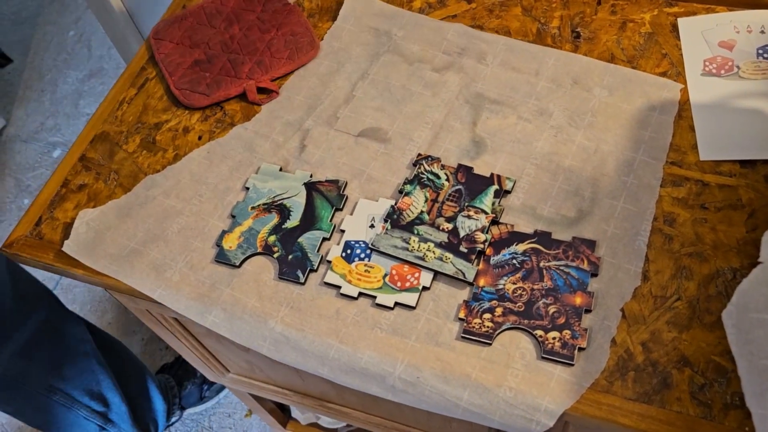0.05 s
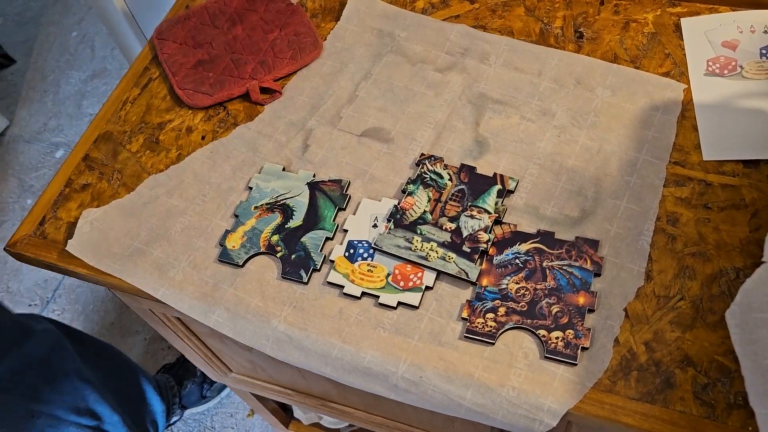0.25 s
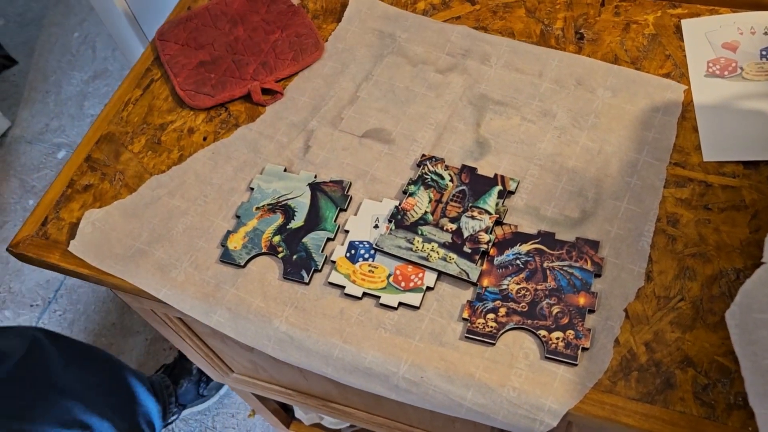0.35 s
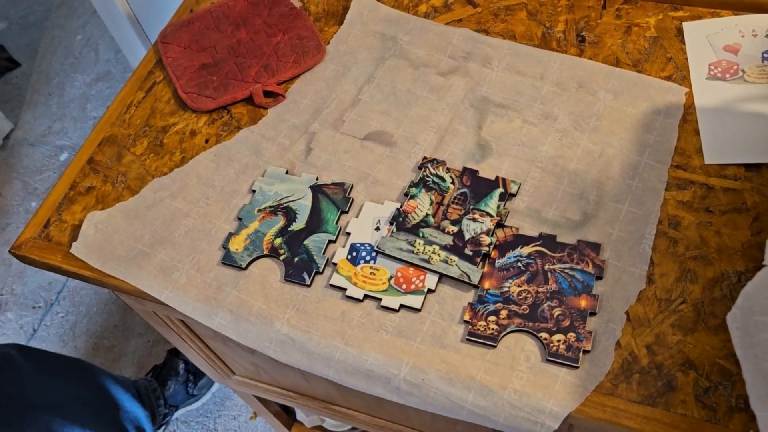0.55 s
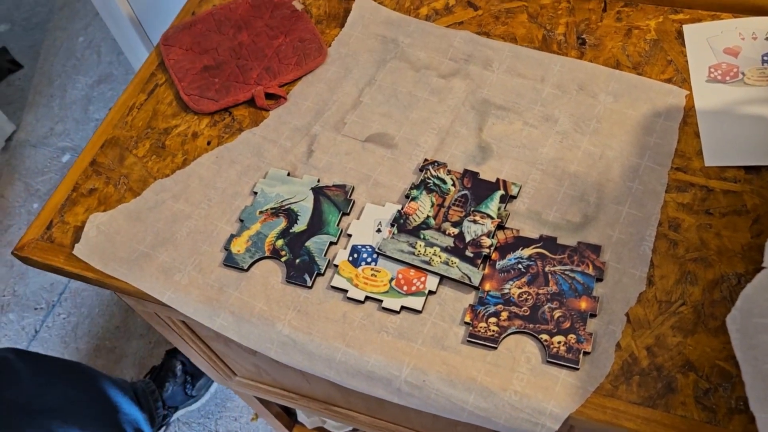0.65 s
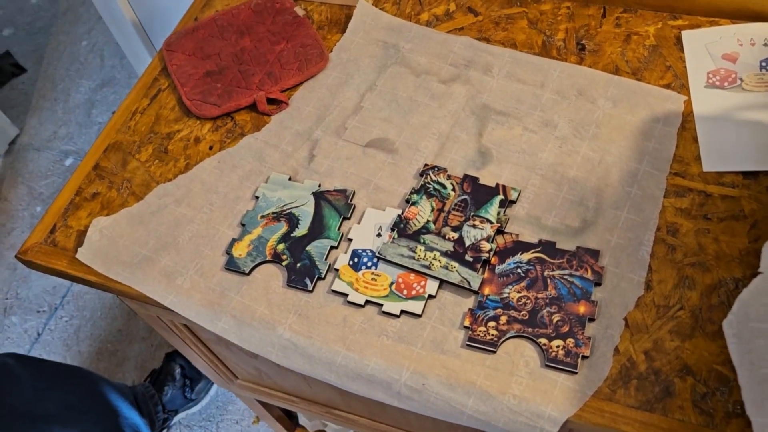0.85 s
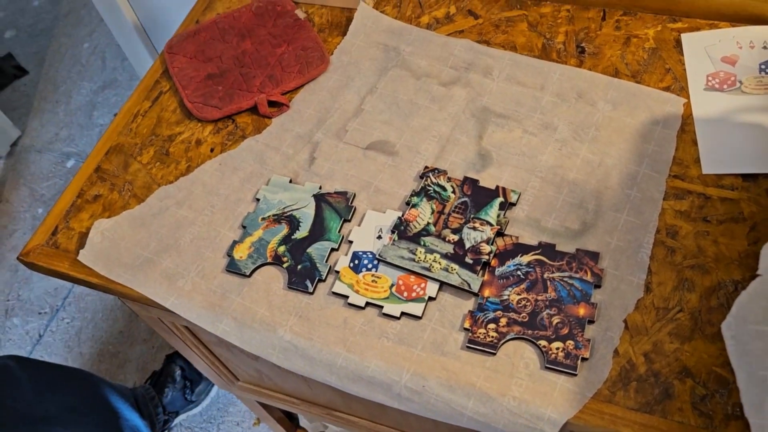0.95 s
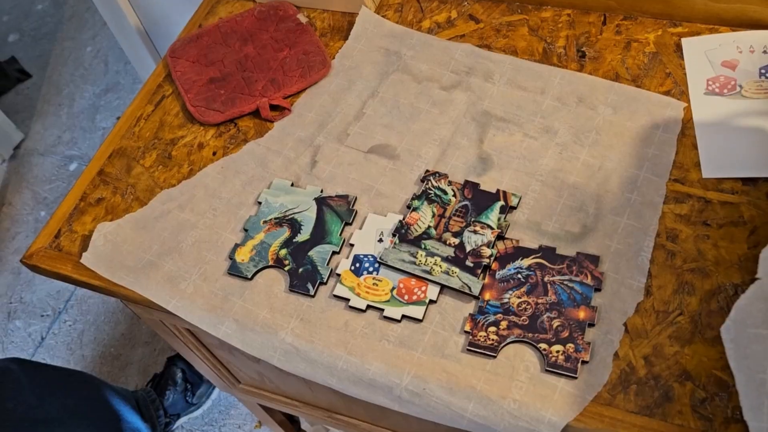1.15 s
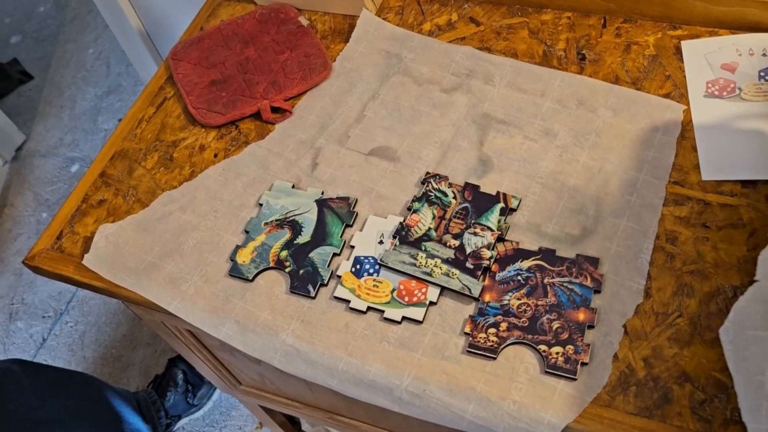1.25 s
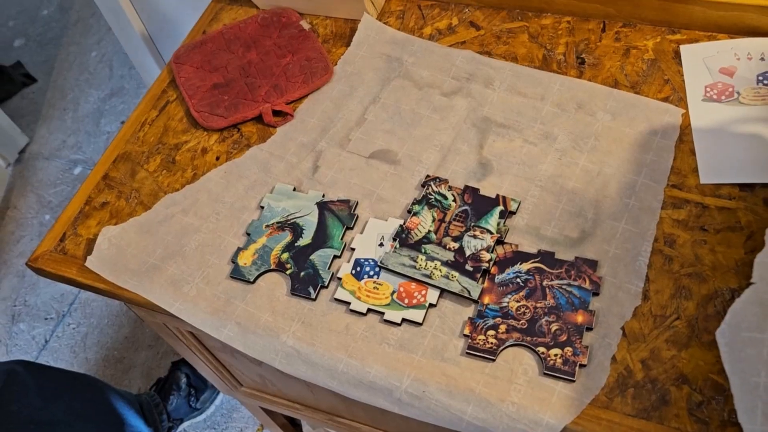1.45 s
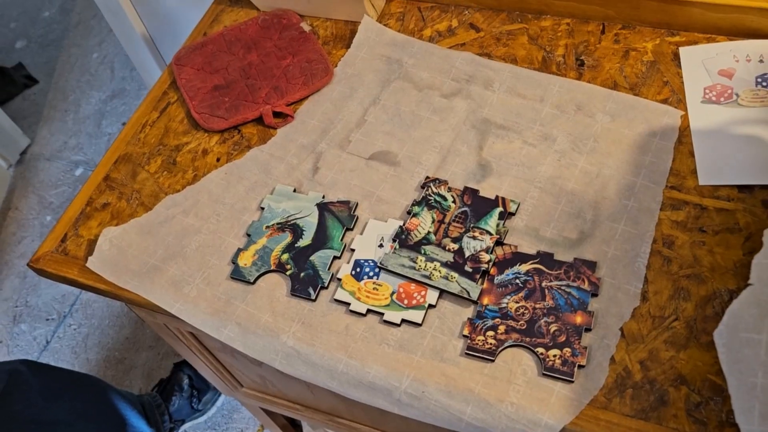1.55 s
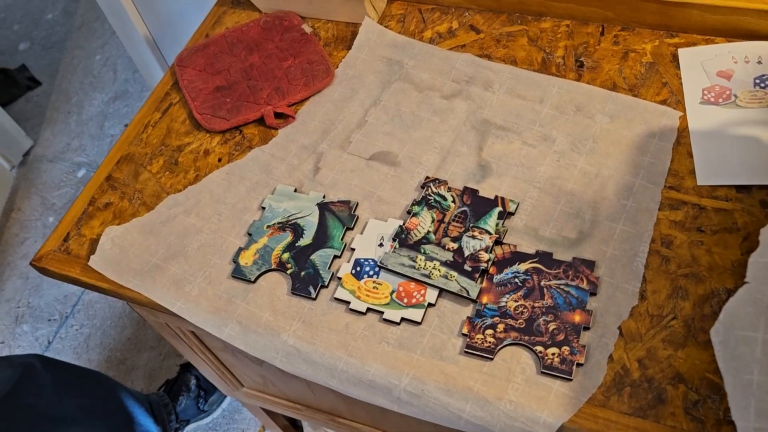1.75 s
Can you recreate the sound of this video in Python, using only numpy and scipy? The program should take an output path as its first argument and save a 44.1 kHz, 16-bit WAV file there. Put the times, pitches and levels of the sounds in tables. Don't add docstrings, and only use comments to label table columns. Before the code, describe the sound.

Close up in a small room, light wooden pieces click and knock in quick uneven clusters, paper rasps underneath and the bench thuds softly; the clatter then gives way to quiet sliding and a few faint ticks.

```python
import sys
import numpy as np
from scipy import signal
from scipy.fft import rfft, irfft, next_fast_len
from scipy.io import wavfile
from scipy.ndimage import map_coordinates

SR = 44100
rng = np.random.default_rng(int(sys.argv[2]) if len(sys.argv) > 2 else 0)


def materialize(psi):
    bounded = np.clip(np.atleast_2d(psi).T, -1, 1)
    quanta = np.round(bounded * 32767).astype(np.int16)
    wavfile.write(sys.argv[1], SR, quanta)


def gain_from_db(level_db):
    decades = np.asarray(level_db, float) / 20
    return 10 ** decades


N = 79380
SPAN = 16384
OPPOSITE = np.array([[1], [-1]])


def unit(x):
    return x / np.sqrt(np.mean(x ** 2, axis=-1, keepdims=True) + 1e-20)


def along(points, hz):
    f, v = np.transpose(points)
    return np.interp(np.log(hz + 1), np.log(f + 1), v)


def wobble(rate):
    knots = rng.standard_normal(int(N * rate / SR) + 4)
    return map_coordinates(knots, [np.arange(N) * rate / SR])


def filtered(x, response):
    m = next_fast_len(x.shape[-1] + 8192)
    return irfft(rfft(x, m) * response(np.fft.rfftfreq(m, 1 / SR)), m)[..., :x.shape[-1]]


def causal(points):
    def response(hz):
        cepstrum = irfft(np.log(gain_from_db(along(points, hz))))
        half = len(cepstrum) // 2
        cepstrum[1:half] *= 2
        cepstrum[half + 1:] = 0
        return np.exp(rfft(cepstrum))
    return response


def mode(f, hz, wide_hz):
    return 1j * f * wide_hz / (hz * hz - f * f + 1j * f * wide_hz)


def grit(size, per_s, spread_db):
    hits = rng.random(size) < per_s / SR
    signs = rng.choice([-1, 1], size)
    sizes = gain_from_db(spread_db * np.clip(rng.standard_normal(size), -2, 2))
    return unit(hits * signs * sizes)


def ports(near, diffuse):
    late_s = 22 / 44100
    levels = gain_from_db(np.array([[-3], [0]]))
    lag = lambda f: np.exp(1j * np.pi * f * late_s * OPPOSITE)
    return levels * filtered(np.array([near, near]), lag) + diffuse


def air():
    # (frequency [Hz], level per Hz [dB])
    hum_curve = [(15, -21), (25, 32.5), (60, 5.5), (334, 7), (419, 6), (509, 3.5), (788, 5), (1200, -5),
                 (1560, -54), (2640, -120)]
    # (time [s], rumble level [dB])
    leaning = [
        (0, 3.5),
        (.08, 7),
        (.64, 13.5),
        (0.719, 1),
        (.86, 2),
        (1.04, 16),
        (1.139, 0.5),
        (1.8, 0.5),
    ]
    mid, side = unit(filtered(rng.standard_normal((2, N)), lambda f: gain_from_db(along(hum_curve, f))))
    hum = mid + gain_from_db(-14) * side * OPPOSITE
    rumble = filtered(hum, lambda f: 1 / (1 + (83 / (f + 1)) ** 4))
    weight = gain_from_db(np.interp(np.arange(N) / SR, *np.transpose(leaning)))
    return gain_from_db(-52.5) * (hum + rumble * (weight - 1))


def bench():
    # (time [s], level [dB], frequency [Hz], time to the peak [s])
    thuds = [(.025, -48.5, 179, 0.0043), (.074, -39.5, 164, 0.012), (0.202, -42, 202, 0.0093),
             (0.243, -42.5, 195, 0.011), (.25, -35.5, 725, 0.01), (0.342, -41, 149, 0.022),
             (0.368, -38, 71, 0.012), (0.388, -34, 327.5, 0.012), (0.441, -38, 109, 0.013),
             (.455, -40.5, 53, 0.029), (.486, -26, 600, 0.0024), (0.549, -33.5, 265.5, 0.014),
             (.57, -41.5, 120.4, 0.018), (0.954, -42.5, 313, 0.029), (.967, -30.5, 700, 0.0074),
             (.969, -34, 610, 0.0084), (0.968, -27.5, 1108, 0.0095), (0.963, -42, 58.4, 0.0095),
             (1.011, -42, 178, 0.02), (1.252, -51.5, 164, 0.012), (1.261, -38, 52.1, 0.034)]
    # (time [s], level [dB], frequency [Hz], width [Hz])
    pop = [
        (1.3015, -27.5, 358, 600),
    ]
    out, t = np.zeros((2, N + SPAN)), np.arange(SPAN) / SR
    for s, db, hz, peak_s in thuds:
        shape = t / peak_s * np.exp(1 - t / peak_s)
        rough = filtered(rng.standard_normal((2, SPAN)), lambda f: mode(f, hz, hz / 2))
        rough = unit(rough) * min(1, hz / 120) ** 2
        ring = np.sin(2 * np.pi * hz * t) + 0.9 * rough[0] + 0.2 * rough[1] * OPPOSITE
        out[:, round(s * SR):][:, :SPAN] += gain_from_db(db - 2.5) * ring * shape
    (s, db, hz, wide_hz), = pop
    impulse = 1. * (np.arange(N) == round(s * SR))
    push = filtered(impulse, lambda f: -mode(f, hz, wide_hz) ** 2)
    return out[:, :N] + gain_from_db(db + 3.0) * push / np.abs(push).max()


def scuff():
    # (middle [s], half length [s], level [dB], extra treble [dB], extra low part [dB])
    strokes = [(0.07, 0.0051, -48, 9.5, 4.5), (0.12, 0.035, -47, 12.5, 10), (0.244, 0.056, -41, 0, 4),
               (0.297, 0.022, -45.5, -5, 0), (0.358, 0.033, -35.5, -3.5, -2.5), (0.403, 0.058, -62, 24, -9),
               (0.485, 0.04, -42, 4.5, 6), (0.59, 0.066, -44, 8.5, 10), (0.656, 0.022, -26, -27, -15),
               (0.732, 0.019, -27, -13.5, -10), (0.816, 0.27, -40.5, -4, 0), (0.934, 0.088, -41.5, 6, 3.5),
               (0.98, 0.094, -38.5, -18, 8), (1.072, 0.03, -36.5, 4.5, 4), (1.104, 0.038, -41, -2, 7),
               (1.216, 0.044, -39.5, -4, 0.5), (1.249, 0.068, -38.5, -25, 1), (1.328, 0.026, -43.5, 2, 1),
               (1.402, 0.032, -37.5, -11, -1), (1.511, 0.04, -42.5, -5.5, -0.5),
               (1.617, 0.12, -39, 1, -5.5), (1.706, 0.018, -39, 4.5, -0.5), (1.79, 0.043, -44.5, 3, -1)]
    # (frequency [Hz], level [dB])
    paper_tone = [(300, -10), (800, -5.5), (1300, 3), (2100, 3), (4000, -4), (6000, -6), (12000, -5.5),
                  (16000, 6.5)]
    slide_hz, slide_wide_hz = 2060, 490
    swap_s, swap_takes_s = 1.542, 0.02
    treble_from_hz, low_to_hz, rest_db = 4330, 2510, -50.5
    t = np.arange(N) / SR
    s, half, db, bright_db, full_db = np.transpose(strokes)[..., None]
    power = np.exp(-2 * ((t - s) / half) ** 2)

    def swell(extra_db):
        return np.sqrt((gain_from_db(2 * (db + extra_db)) * power).sum(axis=0) + gain_from_db(2 * rest_db))

    clump = gain_from_db(1.5 * wobble(60))
    near = grit(N, per_s=3500, spread_db=6.0) + gain_from_db(-12.5) * rng.standard_normal(N)
    diffuse = gain_from_db(5.5) * np.sqrt(clump) * rng.standard_normal((2, N))
    rub = filtered(ports(near * clump, diffuse), causal(paper_tone))
    rub = rub / np.sqrt(np.mean(rub ** 2))

    swapped = (1 + np.tanh((t - swap_s) / swap_takes_s)) / 2
    second = lambda f: 1.43 * (mode(f, 1500, slide_wide_hz) - mode(f, 3960, 3 * slide_wide_hz))
    rub = rub + swapped * (filtered(rub, second) - .6 * rub)

    top = filtered(rub, lambda f: 1 / (1 + (treble_from_hz / (f + 1)) ** 6))
    singing = lambda f: 1 + mode(f, slide_hz, slide_wide_hz)
    low = filtered(rub, lambda f: singing(f) / (1 + (f / low_to_hz) ** 6))
    return gain_from_db(6.5) * (swell(0) * (rub - top - low) + swell(bright_db) * top + swell(full_db) * low)


def ticks():
    # (time [s], peak level [dB], mode frequency [Hz], crack over the mode [dB])
    tick_events = [(0.0588, -34, 2200, -17), (0.0761, -38, 2060, -18), (0.1056, -24.5, 1960, -6),
                   (0.2097, -20.5, 2180, -19), (0.255, -16, 1620, -5), (0.2589, -17, 2330, -16),
                   (0.392, -16, 2170, -5), (0.4617, -22, 1950, -19), (0.6309, -17.5, 1940, -18),
                   (0.6429, -20.5, 1440, -10), (0.728, -18, 3040, -7), (0.855, -4, 1840, -7.5),
                   (0.8579, -4.5, 1460, -8), (0.9182, -21, 2340, -17), (0.9258, -23, 2200, -12),
                   (0.9564, -10.5, 2120, -10), (0.9662, -18, 2280, -26), (1.0044, -17.5, 2060, -15),
                   (1.0182, -24, 2260, -21), (1.056, -19, 2260, -23), (1.293, -28.5, 1690, 0.5),
                   (1.2974, -34, 2200, 8), (1.6327, -30, 1550, -6), (1.6859, -26, 2340, -13),
                   (1.694, -22.5, 1410, -9), (0.338, -18.5, 4200, -16.5), (0.5029, -30, 3400, -13),
                   (0.5304, -31, 3570, -14), (0.6104, -25.5, 3300, 1), (0.6554, -23, 3800, -7),
                   (0.7169, -26, 3470, -10), (0.8239, -25, 4290, -21), (1.3901, -31, 3600, -8),
                   (1.5149, -30.5, 4040, -10), (1.5264, -25.5, 3960, -10), (1.6901, -42, 4470, -16)]
    fade_cycles, upper_ratio, upper_db = 10.1, 1.76, -9
    crack_t60_s, answer_t60_s, answer_db = 0.0035, 0.036, -5
    near, t = np.zeros(N + SPAN), np.arange(1024) / SR
    for s, db, hz, crack_db in tick_events:
        fade = gain_from_db(-60 * t * hz / fade_cycles) * (1 - np.exp(-t * hz * 2))
        ring = np.sin(2 * np.pi * hz * t) + gain_from_db(upper_db) * np.sin(2 * np.pi * hz * upper_ratio * t)
        crack = gain_from_db(crack_db - 60 * t / crack_t60_s) * np.diff(rng.standard_normal(len(t) + 1))
        near[round(s * SR):][:len(t)] += gain_from_db(db + 3) * (ring * fade + crack)
    answer = gain_from_db(-60 * np.arange(4096) / SR / answer_t60_s) * rng.standard_normal((2, 4096))
    wet = signal.fftconvolve(near[None, :N], answer / np.linalg.norm(answer[0]), axes=1)[:, :N]
    return ports(near[:N], gain_from_db(answer_db) * wet)


def room_tail(on, rise):
    t60_s, onset_s, dull_hz, glance_t60_s = 0.19, 0.0018, 7700, 0.035
    swell = gain_from_db(-2 - 60 * on / t60_s) * rise * (1 - np.exp(-on / onset_s))
    walls = swell * rng.standard_normal((2, SPAN)) / 10
    walls = filtered(walls, lambda f: 1 / (1 + 1j * f / dull_hz))
    glance = gain_from_db(-10 - 60 * on / glance_t60_s) * rise * rng.standard_normal((2, SPAN))
    return walls + glance


def contacts(table, rise_s, snap, wet_db):
    # (multiple of the main mode, level [dB])
    piece_modes = [
        (1, 6.5),
        (1.55, -12.5),
        (2.1, -14),
        (.7, -1),
    ]
    mode_t60_s, scatter = 0.0081, 0.021
    chatter_db, chatter_t60_s = -9.5, 0.2
    wet_per_db = .15
    tail_widens = 1.3
    wide_hz = np.log(1000) / np.pi / mode_t60_s
    out, lead = np.zeros((2, N + SPAN)), round(.004 * SR)
    on = np.maximum(np.arange(SPAN) / SR - .004, 0)
    for s, db, hz, crack_db in table:
        rise = gain_from_db(wet_db + wet_per_db * db) * (1 - np.exp(-on / rise_s)) ** 2
        smear = unit(rng.standard_normal(SPAN) * on ** 2 * np.exp(-2 * on / rise_s)) / np.sqrt(SPAN)
        force = gain_from_db(4) * smear + snap * (np.arange(SPAN) == lead + round(rise_s * SR))
        chatter = gain_from_db(chatter_db - 60 * on / chatter_t60_s) * rise
        chatter = chatter * grit(SPAN, per_s=950, spread_db=0.5) / 10
        tail = room_tail(on, rise)
        tune = np.exp(scatter * rng.standard_normal(len(piece_modes)))

        def body(f, blur=1):
            ring = sum(gain_from_db(g) / np.sqrt(blur) * mode(f, min(hz * k * u, SR / 3), wide_hz * k * blur)
                       for (k, g), u in zip(piece_modes, tune))
            return ring + gain_from_db(crack_db + 5.5) * (1j * f / (1800 + 1j * f)) ** 2

        blow = np.abs(filtered(force, body)).max()
        direct = filtered(ports(force, 0), body)
        later = filtered(ports(chatter, tail), lambda f: body(f, tail_widens))
        out[:, round(s * SR) - lead + 20:][:, :SPAN] += gain_from_db(db) / blow * (direct + later)
    return out[:, :N]


def scene():
    # (time [s], peak level [dB], main mode [Hz], crack over the mode [dB])
    clicks = [(0.3379, -12, 3520, 14), (0.3386, -14.5, 1580, -49), (0.3663, -22, 2030, -29),
              (0.3807, -17.5, 2010, -35), (0.3878, -9.5, 1580, -18), (0.392, -3.5, 1820, -9.5),
              (0.4002, -5, 1600, -13), (0.4555, -16.5, 1660, -24), (0.4858, -11, 1950, -22),
              (0.4925, -20.5, 3270, -29), (0.5256, -15.5, 1810, -31), (0.5424, -21, 1840, -24),
              (0.5716, -13, 2120, -3), (0.6031, -12.5, 5600, -11), (0.6305, -7.5, 2010, -20),
              (0.636, -8, 1500, -9), (0.7696, -16.5, 2010, -22), (0.8016, -25.5, 1420, -33),
              (0.818, -12.5, 1500, -17.5), (0.854, -2, 1940, -7), (0.8588, -0.5, 2170, 6),
              (0.8687, -3.5, 1990, -7.5), (0.8742, -6, 1440, -53), (0.9188, -13, 2150, -27),
              (0.9258, -12, 2060, -24), (0.9665, -4.5, 2510, -18), (0.9705, -5, 1020, -15.5),
              (1.3189, -26, 3370, -11), (1.5157, -28, 4050, -21)]
    # (time [s], peak level [dB], main mode [Hz], crack over the mode [dB])
    taps = [(0.0771, -30.5, 1920, -24), (0.2047, -20.5, 2110, -23), (0.2088, -30, 2220, -36),
            (0.2549, -23, 1720, -19), (0.5606, -22, 2100, -17), (0.7272, -22.5, 2950, 2),
            (0.955, -26, 2280, 1), (1.0035, -40, 2340, -33), (1.057, -23.5, 2270, -11),
            (1.2905, -23.5, 1350, -13.5), (1.685, -27.5, 4370, -24)]
    sharp = contacts(clicks, rise_s=.0006, snap=1.203, wet_db=-1.0)
    soft = contacts(taps, rise_s=0.0056, snap=0.021, wet_db=-10.0)
    return air() + bench() + scuff() + ticks() + soft + sharp


def roll_off(x):
    return signal.sosfilt(signal.butter(12, 16480, fs=SR, output="sos"), x)


def record(dry):
    # (frequency [Hz], level [dB])
    left_port = [(700, -5.5), (1300, -8.5), (4500, 0), (7700, 4), (9800, -5), (12500, -10), (14500, -6.5),
                 (16000, 11.5)]
    right_port = [(700, -4.5), (1400, -0.5), (4400, 7.5), (5300, -4), (7700, 1), (9500, -20), (12000, 0),
                  (15800, -26.5)]
    low_hz, roll_hz, top_hz, ceiling = 42, 14320, 16500, .92
    x = np.array([filtered(v, causal(port)) for v, port in zip(dry, (left_port, right_port))])
    x = x / (1 + np.abs(x / ceiling) ** 4) ** .25

    def limits(f):
        notch = 1 - mode(f, 9650, 600)
        return notch * (f < top_hz) / (1 + (f / roll_hz) ** 40) / (1 + (low_hz / (f + 1)) ** 6)

    return roll_off(filtered(x, limits))


dry = scene()
out = record(dry)
materialize(out)
```